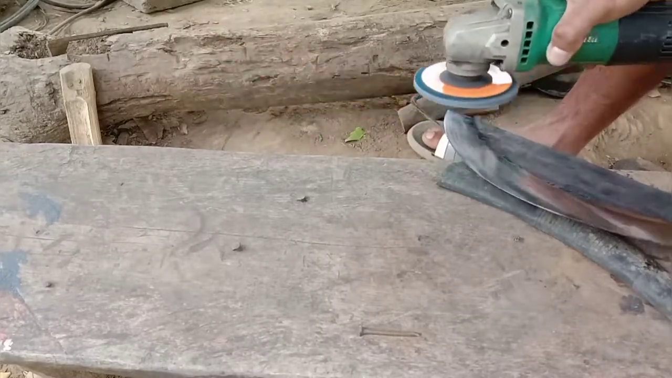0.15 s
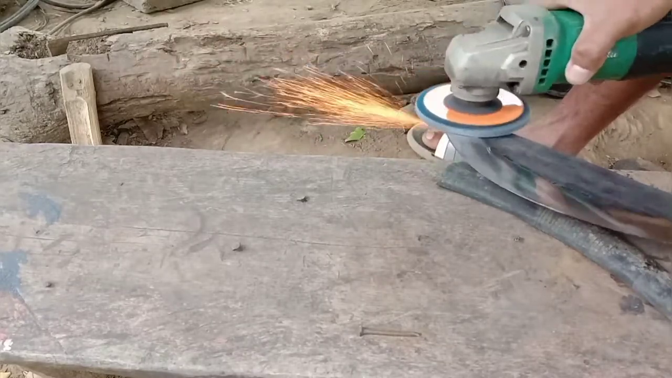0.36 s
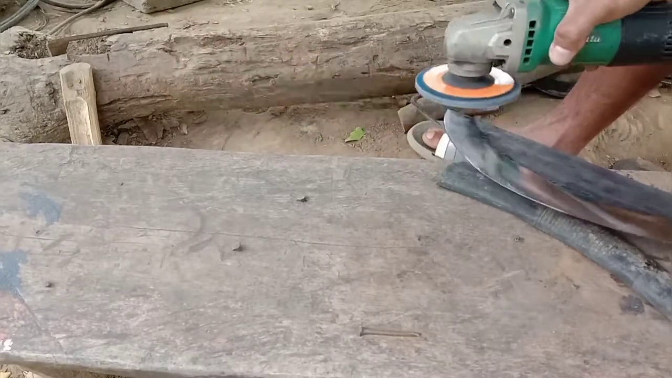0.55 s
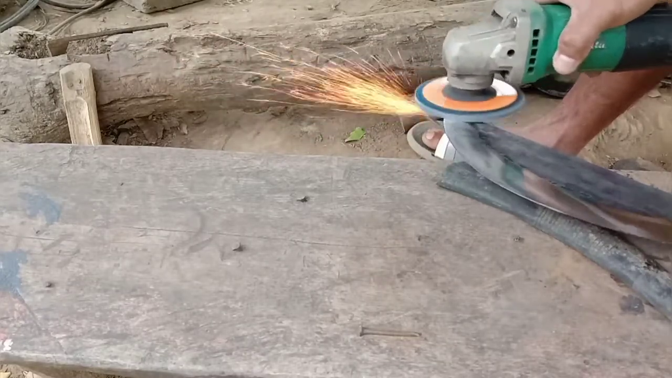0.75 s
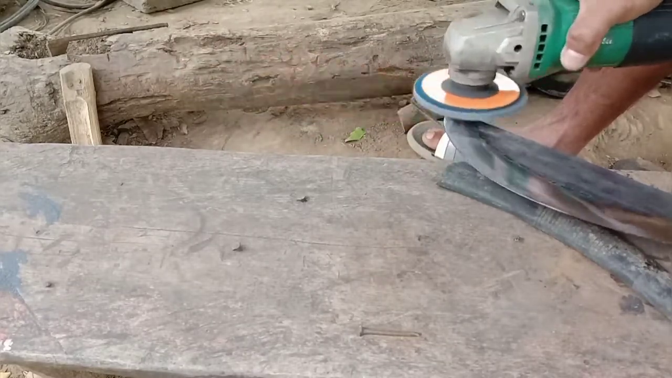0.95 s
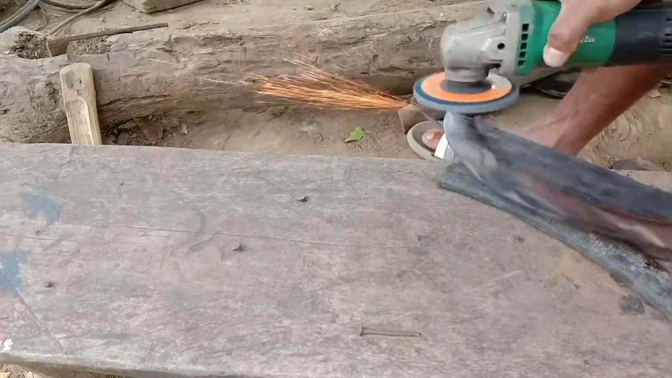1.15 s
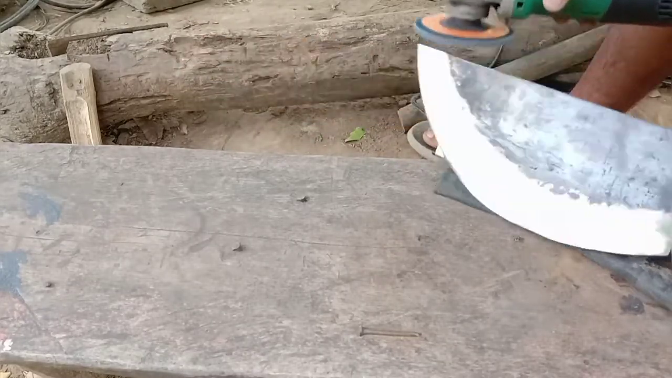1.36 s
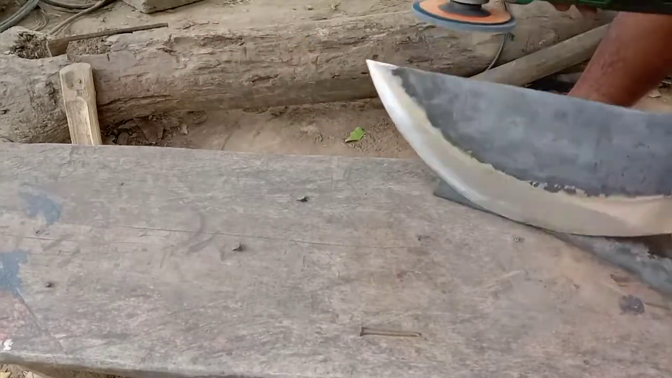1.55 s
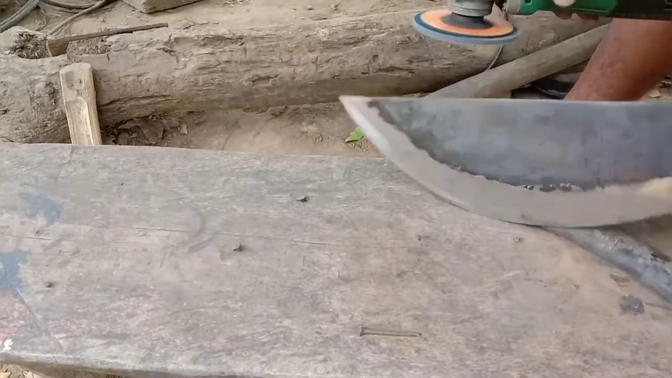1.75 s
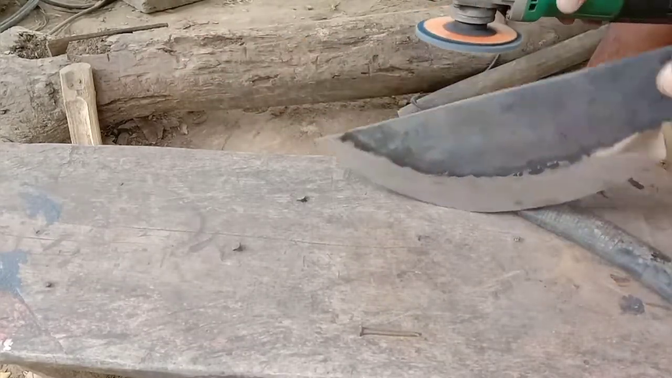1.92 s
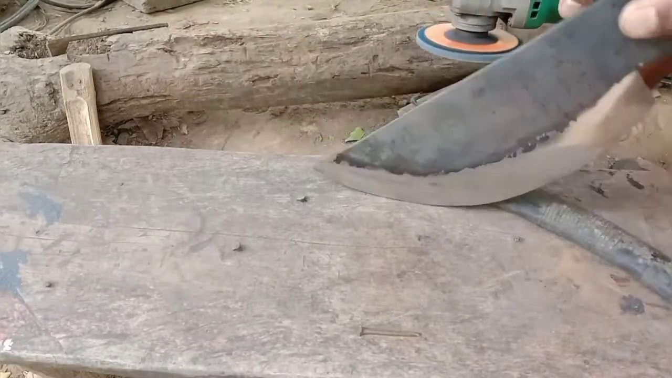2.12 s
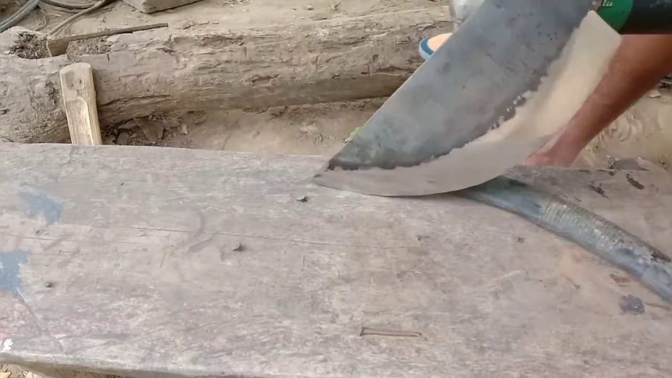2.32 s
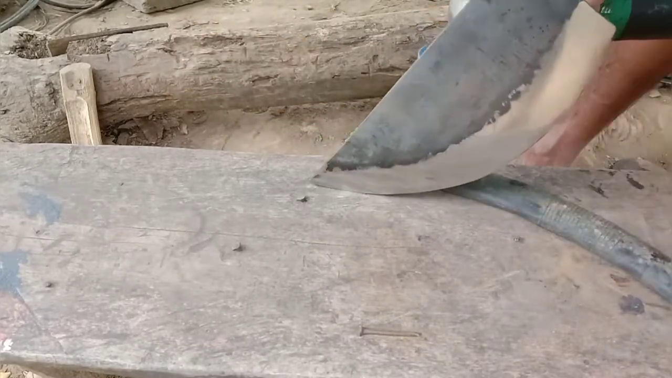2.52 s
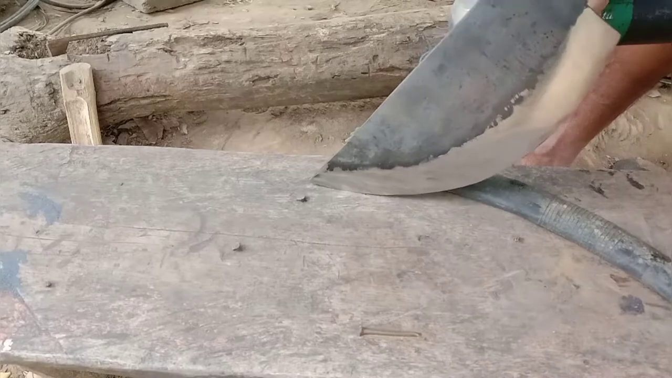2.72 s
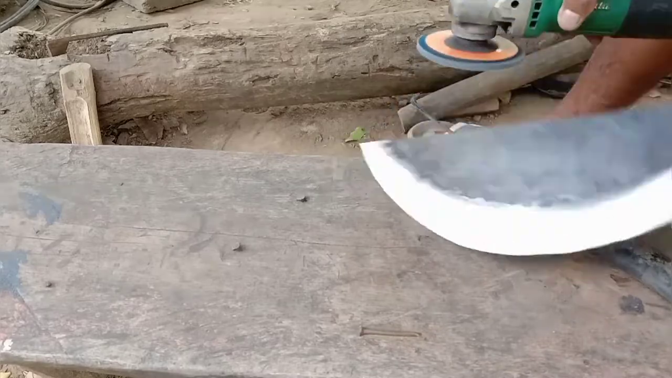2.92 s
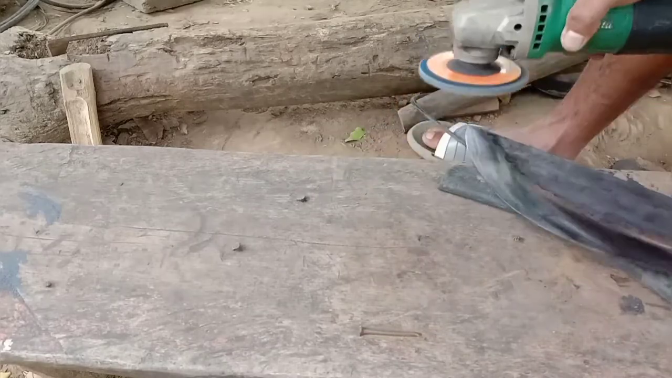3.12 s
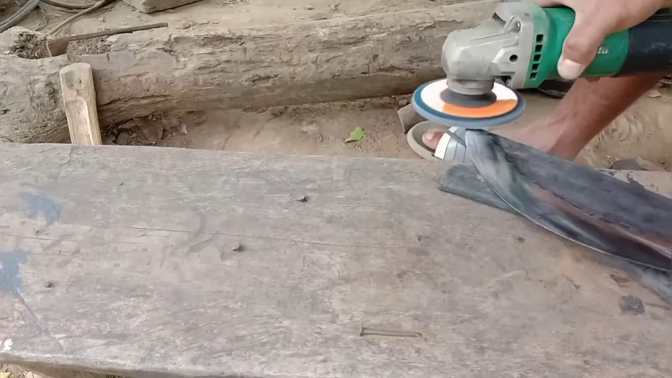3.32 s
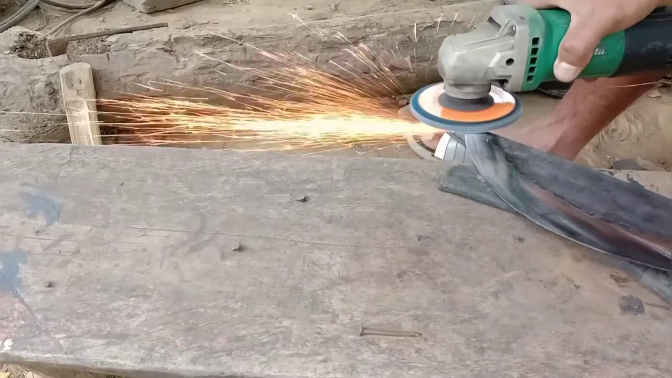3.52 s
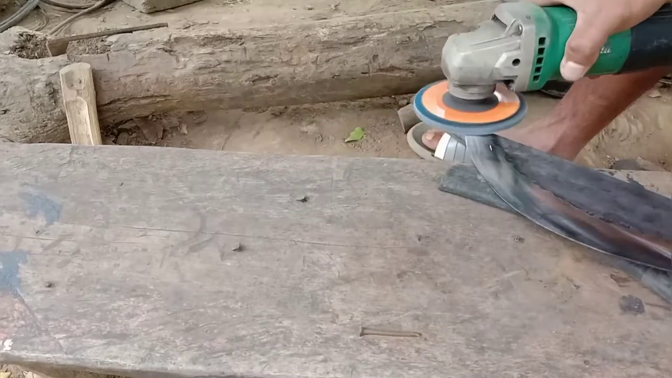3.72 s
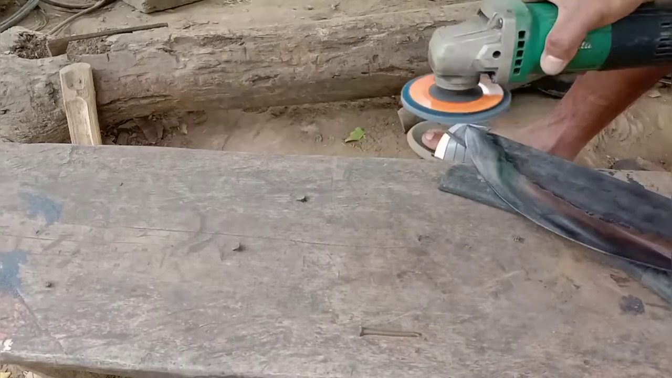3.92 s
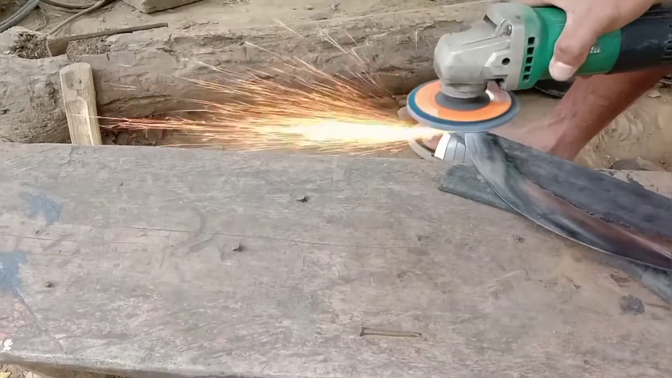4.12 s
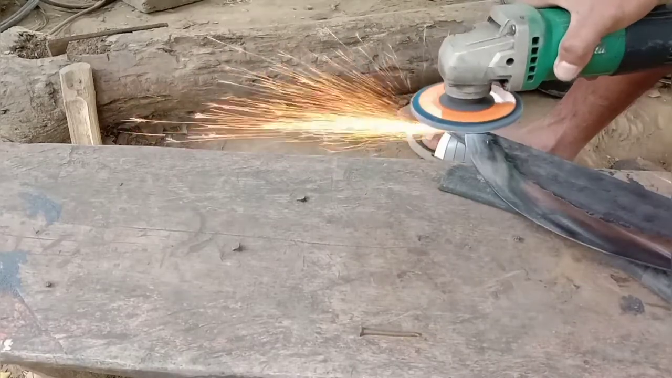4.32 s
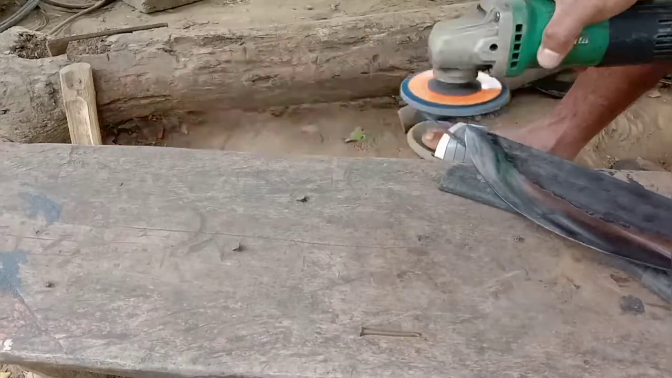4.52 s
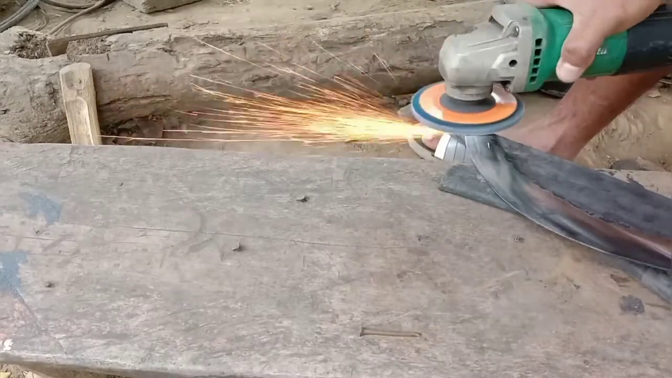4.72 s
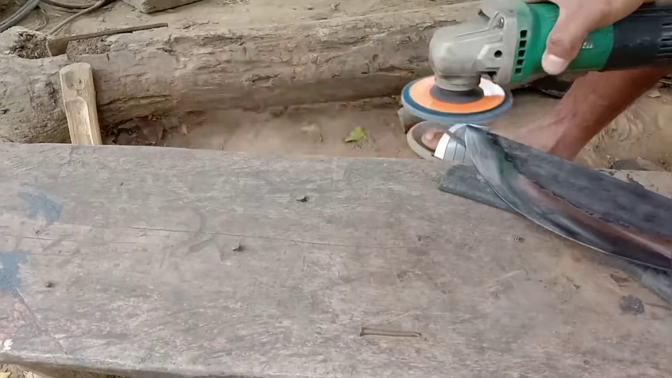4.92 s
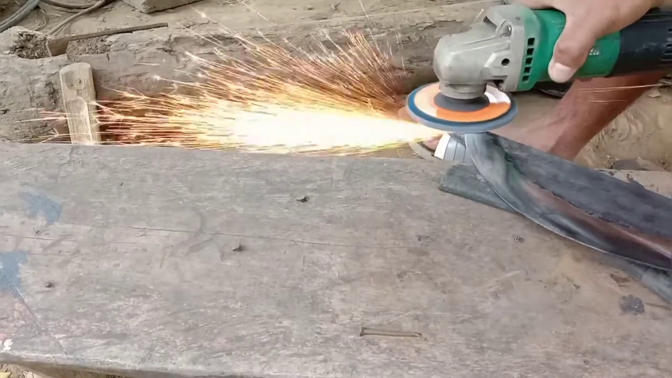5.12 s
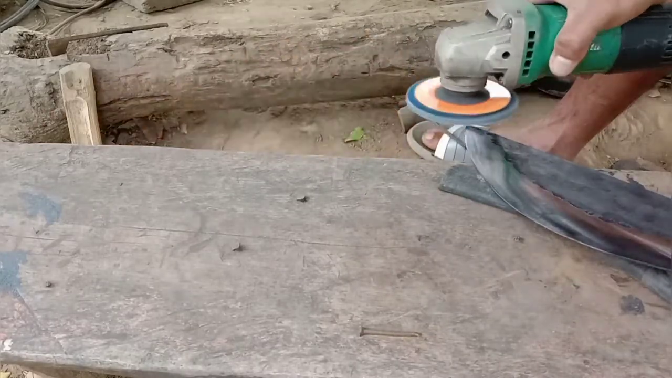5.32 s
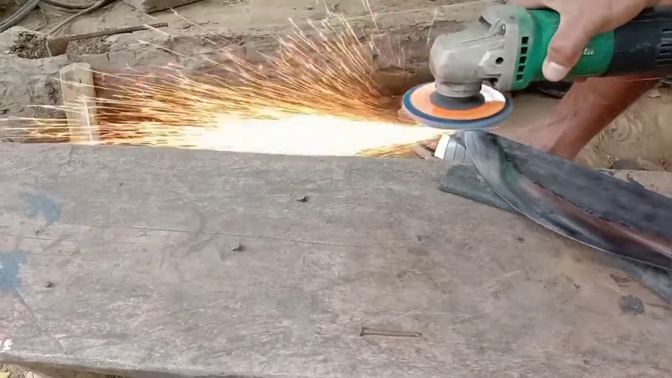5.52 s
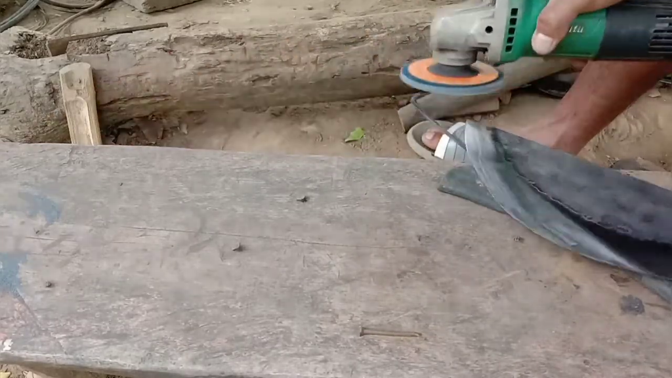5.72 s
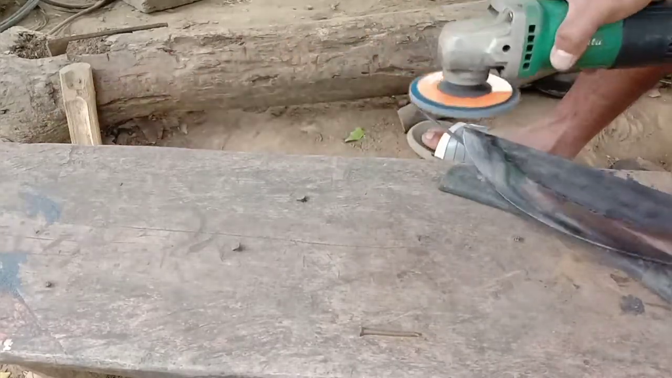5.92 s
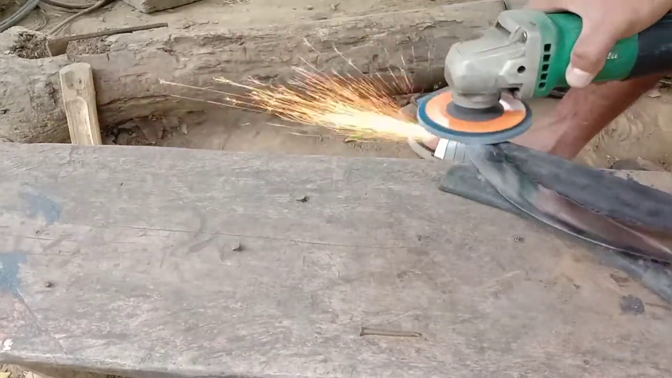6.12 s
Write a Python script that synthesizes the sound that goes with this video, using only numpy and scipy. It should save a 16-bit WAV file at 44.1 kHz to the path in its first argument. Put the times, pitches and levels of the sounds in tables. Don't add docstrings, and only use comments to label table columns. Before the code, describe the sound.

Close to one microphone outdoors, an angle grinder runs continuously with a piercing electric whine over hissing cooling air. Four quick touches on a steel blade make the pitch sag and scrape, with thumping air pops. The whine then softens and steadies for over a second before turning loud again. From the middle on, repeated bites ring the blade brightly, chatter briefly and throw crackling gusts at the microphone.

```python
import sys
import numpy as np
from scipy import signal
from scipy.fft import rfft, irfft, next_fast_len
from scipy.io import wavfile
from scipy.ndimage import uniform_filter1d, map_coordinates

SR = 44100
rng = np.random.default_rng(int(sys.argv[2]) if len(sys.argv) > 2 else 0)


def field_ratio(decibels):
    return 10 ** (np.asarray(decibels, dtype=float) / 20)


def generate_wav(sig):
    pcm = np.round(np.clip(np.atleast_2d(sig).T, -1, 1) * 32767).astype(np.int16)
    wavfile.write(sys.argv[1], SR, pcm)


N = 276066

# t/s, fan tone level/dB, octave level/dB
FACING = [(0, -22, -33.5), (.3, -21.5, -37), (.65, -21.5, -32.5), (1.0, -21.5, -35), (1.3, -24, -37.5),
          (1.45, -22.5, -39), (1.8, -24, -38), (1.95, -30.5, -36), (2.2, -33.5, -42.5), (2.36, -30.5, -33),
          (2.8, -33, -34.5), (3.07, -19.5, -33.5), (3.5, -17.5, -34.5), (3.8, -19.5, -36.5),
          (4.3, -23.5, -32), (5.4, -23, -34), (5.8, -24.5, -39.5), (6.12, -16.5, -34.5)]
# t/s, tone loss/dB, octave loss/dB
GROUND_NULLS = [(.32, 3.5, -4), (.73, 7, 1), (1.03, 5, 2), (1.35, 8, 0), (1.45, 3, 7), (2.23, 1, 12),
                (2.5, 13, -2), (2.86, -1, 11), (3.01, 4, -3), (3.63, 6, -1), (4.65, 0.5, 5),
                (5.68, 3.5, -5), (5.9, -1, 7), (5.95, 6, -3), (.09, 1.5, 1), (.47, 8, 7), (.57, 4.5, 6),
                (.82, 3.5, 6), (1.12, 4, 1), (1.25, 6, -3), (4.1, 3, 1), (4.73, 4, 4), (.9, 3, -2),
                (3.88, 2, 2), (4.03, -1, 0), (4.38, -1.5, 1), (5.29, 1.5, -4), (5.76, 2.5, 0),
                (6.2, 4.5, -3)]
# t/s, length/s, drag on the fan pitch/(Hz per s)
BITES = [(0.072, 0.107, 3180), (0.361, 0.214, 4822), (0.726, 0.154, 4379), (1.069, 0.167, 5361),
         (2.07, 0.11, 426), (3.468, 0.187, 1780), (3.793, 0.176, 3526), (4.105, 0.133, 3335),
         (4.365, 0.148, 3794), (4.718, 0.175, 3687), (5.078, 0.171, 3877), (5.431, 0.204, 4487),
         (6.054, 0.264, 2933)]
# loudest point/share of bite, scrape/dB, ring/dB, upper ring/dB, softer start/dB
STEEL = [(.8, -34.5, -39, -40, 1), (.6, -35.5, -53, -44, -3), (.7, -35.5, -42, -42, 1),
         (1, -32, -28.5, -35, -5), (.5, -70, -70, -70, 0), (0.59, -37, -22, -33, -4),
         (0.97, -33, -22.5, -32.5, -3.5), (0.7, -35.5, -23, -34, -0.5), (0.6, -35, -22.5, -33.5, 0.5),
         (0.69, -38, -22.5, -33, -1), (0.76, -34, -24, -31.5, -0.5), (0.6, -30.5, -21, -34, -5),
         (0.71, -32.5, -27, -39, -11)]
# f/Hz, level/dB
SCRAPE_COLOUR = [(1000, -120), (2500, -37), (3200, -8), (5000, -5), (7000, 1), (9500, 8.5), (12000, 12.5),
                 (15500, 11)]
# f/Hz, width/Hz, level/dB
BLADE_MODES = [(5010, 70, -9), (5825, 65, -1), (6000, 80, -8), (6160, 60, -1), (6255, 60, 0)]
# f/Hz, width/Hz, level/dB
UPPER_MODES = [(3080, 200, -13), (4000, 60, -6), (7080, 80, -1), (7300, 120, -8), (7520, 80, 0),
               (7910, 80, -5), (8600, 250, -10), (8890, 100, -7)]
# f/Hz, width/Hz, level/dB
EDGE_MODES = [(10500, 180, 0), (11250, 60, 0), (12520, 90, 2), (13200, 110, -6), (14300, 100, 1),
              (14720, 150, 0), (15400, 120, -3)]
# t/s, length/s, level/dB
CHATTERS = [
    (3.5, 0.12, -40),
    (3.863, 0.088, -32),
    (4.14, .06, -32),
    (4.391, 0.095, -30),
    (4.793, 0.057, -23.5),
    (5.114, 0.089, -28),
    (5.442, 0.13, -28.5),
    (6.156, 0.073, -31),
]
# t/s, length/s, loudest point/share of gust, thump level/dB, crackle level/dB
GUSTS = [(0.087, 0.02, .3, -40, -52), (0.149, 0.068, 0.48, -32.5, -42), (0.248, 0.11, 0.38, -48, -55),
         (.4, 0.15, 0.68, -20.5, -25), (.47, 0.11, 0.84, -17.5, -21.5), (.77, .12, 0.77, -23, -29.5),
         (1.088, 0.05, 0.089, -31, -52), (1.152, 0.12, 0.06, -40, -53), (1.6, 0.18, 0.15, -46, -67),
         (1.808, .04, .5, -44, -57), (2.448, 0.18, 0.57, -48.5, -53), (2.736, .15, .15, -53, -48),
         (3.608, 0.033, 0.28, -21.5, -34), (3.92, 0.061, 0.64, -21, -25.5),
         (4.161, 0.082, 0.66, -27.5, -31), (4.432, 0.096, 0.84, -22.5, -27), (4.73, 0.034, .35, -32, -45),
         (4.809, 0.081, 0.75, -39, -38.5), (5.194, 0.064, 0.61, -21, -20.5),
         (5.543, 0.13, 0.35, -20.5, -19.5), (5.579, 0.072, 0.79, -20, -21.5), (5.82, 0.16, 0.67, -46, -57),
         (6.01, 0.038, 0.49, -46, -60), (6.145, 0.16, 0.98, -41.5, -39)]
# t/s, thump level/dB
PUFFS = [(.03, -57), (1.33, -60), (1.47, -66), (1.72, -59), (2.43, -54), (2.9, -56), (3.47, -51),
         (3.81, -54), (4.05, -62), (4.6, -58), (4.98, -53), (5.29, -47), (5.44, -47), (5.68, -44.5),
         (5.78, -43), (6.09, -47)]
# t/s, peak level/dB
POPS = [(0.102, -21), (0.176, -31), (0.188, -17), (0.393, -14), (0.42, -11), (0.437, -29), (0.447, -5),
        (0.809, -19), (0.824, -9), (0.536, -25), (0.549, -20), (0.799, -17), (0.852, -31), (1.095, -19),
        (1.101, -14), (1.163, -22), (1.171, -18), (3.616, -6.5), (3.951, -12), (4.21, -25), (4.741, -13),
        (5.217, -9), (5.227, -4.5), (5.554, -4), (5.566, -11), (5.574, -3), (5.617, -2.5)]
# f/Hz, level/dB
THUMP_COLOUR = [(10, -40), (30, -13), (70, -2), (140, 1.5), (300, -3), (500, -7.5), (1000, -18.5),
                (3000, -66), (9000, -77)]
# f/Hz, level/dB
CRACKLE_COLOUR = [(100, -60.5), (350, -5), (800, 3.5), (1400, 1.5), (2200, -10), (3300, -9.5), (4500, -27),
                  (9000, -48)]
# f/Hz, level/dB
RUSH_COLOUR = [(60, -73), (100, -50.5), (300, -31), (600, -28), (1000, -18), (2400, -20), (3900, -13.5),
               (4900, -10.5), (5500, -5), (6300, -14.5), (9000, -22), (11700, -33.5), (19800, -120)]
# f/Hz, level/dB
FIZZ_COLOUR = [(5000, -120), (7000, -8), (9000, -39), (10500, -1), (13000, 1.5), (15200, 5)]
# f/Hz, width/Hz, level/dB
VENT_MODES = [(4300, 300, 0), (4620, 350, -1)]
# f/Hz, width/Hz, level/dB
HOUSING_MODES = [(431, 56, -4), (879, 122, 1), (1398, 118, 3.5), (1786, 240, -2.5), (3450, 214, 1),
                 (5800, 200, 9), (7430, 930, 0.5)]


def whine():
    fan_blades = 12
    tone_db, octave_db = heard() + [0.45 * wobble(18), 1.9 * wobble(14)]
    jolt = field_ratio(gust_levels(edge=.005)[1] + 22) + field_ratio(steel_levels(edge=.012)[1] + 15)
    shake = np.minimum(jolt + .3 * load() ** 2, 1.1)
    turn = fan_turn() + 0.5 * wobble(30) + shake * wobble(350)

    def skirt(near, far):
        slow = wobble(70) + 1j * wobble(70)
        fast = wobble(600) + 1j * wobble(600)
        return near * slow + far * fast

    uneven = 1 + 0.046 * np.exp(-1j * turn / fan_blades)
    tone = field_ratio(tone_db) * (uneven + skirt(near=0.085, far=0.12)) * np.exp(1j * turn)
    octave = field_ratio(octave_db) * (1 + skirt(near=0.13, far=0.082)) * np.exp(2j * turn)
    return np.sqrt(2) * np.real(tone + octave)


def fan_turn():
    free_hz, first_sag_hz, recover_s = 5589, 311, .28
    keep = np.exp(-1 / (recover_s * SR))
    sag_hz = signal.lfilter([1 / SR], [1, -keep], drag(), zi=[first_sag_hz])[0]
    return 2 * np.pi * np.cumsum(free_hz - sag_hz) / SR


def drag():
    lean, lift = .524, .129
    t = np.arange(N) / SR
    total = np.zeros(N)
    for start, length, pull in BITES:
        done = (t - start) / length
        total += pull * np.clip(done / lean, 0, 1) * np.clip((1 - done) / lift, 0, 1)
    return total


def load():
    lag_s, full_drag = 0.034, 4500
    keep = np.exp(-1 / (lag_s * SR))
    return signal.lfilter([1 - keep], [1, -keep], drag()) / full_drag


def heard():
    null_half_width_s = 0.025
    muffle_db = [5.5, 2.5]
    t = np.arange(N) / SR
    loss = sum(np.outer(db, np.exp(-((t - s) / null_half_width_s) ** 2)) for s, *db in GROUND_NULLS)
    return curves(FACING) - loss - np.outer(muffle_db, load())


def bite():
    scrape_db, ring_db, upper_db = steel_levels(edge=0.021)
    lumps = .2628 * fan_turn()
    throb = field_ratio(1.0 * np.sin(lumps / 8) + 0.62 * wobble(150))

    def force(patchy_db):
        return throb * (noise(patchy_db) + grit(density=3000, spread_db=3))

    def rung(db, push, modes):
        return resonant(field_ratio(db) * push, modes) / np.std(resonant(push, modes))

    free = np.clip((ring_db + 38) / 12, 0, 1)
    scrape = field_ratio(scrape_db + 4.5 - 6 * free) * unit(shaped(force(patchy_db=2.2), SCRAPE_COLOUR))
    ring = rung(ring_db + 4.0, force(patchy_db=3), BLADE_MODES)
    upper_ring = rung(upper_db + 5.0, force(patchy_db=4), UPPER_MODES)
    edge_ring = rung(scrape_db - 10.5 + 14 * free, force(patchy_db=3.0), EDGE_MODES)
    return scrape + ring + upper_ring + edge_ring + chatter(lumps)


def chatter(lumps):
    swells = [[(s, db - 11), (s + 0.77 * n, db), (s + n, db - 7)] for s, n, db in CHATTERS]
    level_db = bursts(swells, edge=0.0082)[0] + 2.5 + 2.5 * wobble(80)
    return field_ratio(level_db) * np.sin(lumps + 1.0 * wobble(110))


def steel_levels(edge):
    touch_s, over_s = .024, .012
    onset_db, ending_db, cut_db = (2, -8, -4), (3, -7, -3), (-4, -18, -13)
    shapes = []
    for (start, length, _), (peak, *db, soft_db) in zip(BITES, STEEL):
        shapes.append([(start + touch_s, *np.add(db, np.add(onset_db, soft_db))),
                       (start + min(peak, .97) * length, *db),
                       (start + .98 * length, *np.add(db, ending_db)),
                       (start + length + over_s, *np.add(db, cut_db))])
    return bursts(shapes, edge)


def gusts():
    thump_db, crackle_db = gust_levels(edge=0.011)
    eddies = grit(density=800, spread_db=3.2)
    spray = .6 * eddies + grit(density=1800, spread_db=3)
    thump = field_ratio(thump_db + 0.8) * steady(shaped(eddies, THUMP_COLOUR), size=1500)
    crackle = field_ratio(crackle_db + 5.0) * steady(shaped(spray, CRACKLE_COLOUR), size=1000)
    single = np.zeros(N)
    for s, db in POPS:
        single[round(s * SR)] = -field_ratio(db + 27.5)
    pops = shaped(single, THUMP_COLOUR) + field_ratio(-10.5) * shaped(single, CRACKLE_COLOUR)
    breeze = field_ratio(-68 + 2.1 * wobble(8.3)) * unit(shaped(rng.standard_normal(N), THUMP_COLOUR))
    return thump + crackle + pops + breeze


def gust_levels(edge):
    start_db, end_db = (-15.5, -18), (-18.5, -27)
    puffs = [(s, 0.048, .4, db, db - 6) for s, db in PUFFS]
    shapes = []
    for start, length, peak, *db in list(GUSTS) + puffs:
        shapes.append([(start, *np.add(db, start_db)), (start + peak * length, *db),
                       (start + length, *np.add(db, end_db))])
    return bursts(shapes, edge)


def air():
    rush_follows, vent_follows, housing_follows = 0.18, 0.22, 0.034
    facing_db, strain = heard()[0] + 22, load()
    rush_db = -32.5 + strain + rush_follows * facing_db
    top_db = -6.5 + 2 * strain + 1.0 * wobble(2.9)
    vent_db = -2 - 15 * strain + vent_follows * facing_db
    housing_db = rush_db - 1.2 + (housing_follows - rush_follows) * facing_db
    flutter = field_ratio(0.69 * wobble(24.68))
    rush = field_ratio(rush_db + 4.5) * unit(shaped(noise(patchy_db=1.1), RUSH_COLOUR))
    sparks = noise(patchy_db=.6) + 2.5 * grit(density=600, spread_db=3)
    fizz = field_ratio(rush_db + 0.75 * top_db + 4.5) * unit(shaped(sparks, FIZZ_COLOUR))
    vent = field_ratio(rush_db + 2 * vent_db - 1.0) * unit(resonant(rng.standard_normal(N), VENT_MODES))
    housing = field_ratio(housing_db) * unit(resonant(noise(patchy_db=.6), HOUSING_MODES))
    return flutter * (rush + fizz + vent + housing)


def noise(patchy_db):
    z = signal.stft(rng.standard_normal(N), nperseg=512)[2]
    field = uniform_filter1d(uniform_filter1d(rng.standard_normal(z.shape), 5, 0), 8, 1)
    return signal.istft(z * field_ratio(patchy_db * unit(field)), nperseg=512)[1][:N]


def grit(density, spread_db):
    size = field_ratio(spread_db * np.minimum(rng.exponential(size=N), 2.5))
    return (rng.random(N) < density / SR) * size * rng.standard_normal(N)


def wobble(rate):
    return map_coordinates(rng.standard_normal(int(N * rate / SR) + 4), [np.arange(N) * rate / SR])


def resonant(x, modes):
    def response(hz):
        total = 0
        for k, (centre, width, db) in enumerate(modes):
            damping = 1j * hz * width
            total = total + (-1) ** k * field_ratio(db) * damping / (centre * centre - hz * hz + damping)
        return total
    return filtered(x, response)


def shaped(x, spectrum):
    def response(hz):
        c = irfft(np.log(field_ratio(along(spectrum, hz)) + 1e-6))
        c[1:len(hz) - 1] *= 2
        c[len(hz):] = 0
        return np.exp(rfft(c))
    return filtered(x, response)


def filtered(x, response):
    m = next_fast_len(N + 8192)
    return irfft(rfft(x, m) * response(np.fft.rfftfreq(m, 1 / SR)), m)[:N]


def along(points, hz):
    f, v = np.transpose(points)
    return np.interp(np.log(hz + 1), np.log(f + 1), v)


def curves(rows):
    s, *cols = np.transpose(rows)
    return [np.interp(np.arange(N) / SR, s, c) for c in cols]


def bursts(tables, edge):
    def quiet(row, shift):
        return [(row[0] + shift, *[-95] * len(row[1:]))]
    return np.max([curves(quiet(t[0], -edge) + list(t) + quiet(t[-1], edge)) for t in tables], axis=0)


def unit(x):
    return x / np.sqrt(np.mean(x ** 2) + 1e-20)


def steady(x, size):
    power = np.abs(uniform_filter1d(x ** 2, size))
    return unit(x / np.sqrt(power + .15 * np.mean(x ** 2)))


def scene():
    return np.tile(whine() + bite() + gusts() + air(), (2, 1))


def ducked(x):
    threshold_db, share, back_db_per_s, smooth_s = -10, 0.39, 32.5, 0.004
    back = back_db_per_s * np.arange(N) / SR
    cut = share * np.maximum(20 * np.log10(np.abs(x[0]) + 1e-9) - threshold_db, 0)
    held = np.maximum.accumulate(cut + back) - back
    return x * field_ratio(-uniform_filter1d(held, int(smooth_s * SR)))


def low_pass(x):
    return signal.sosfilt(signal.butter(12, 16850, fs=SR, output="sos"), x)


def record(dry):
    top_hz, ceiling = 15505, 0.88
    level = ducked(dry)
    soft = level / (1 + np.abs(level / ceiling) ** 4) ** (1 / 4)
    mix = np.array([filtered(x, lambda hz: hz < top_hz) for x in soft])
    return low_pass(mix)


dry = scene()
out = record(dry)
generate_wav(out)
```